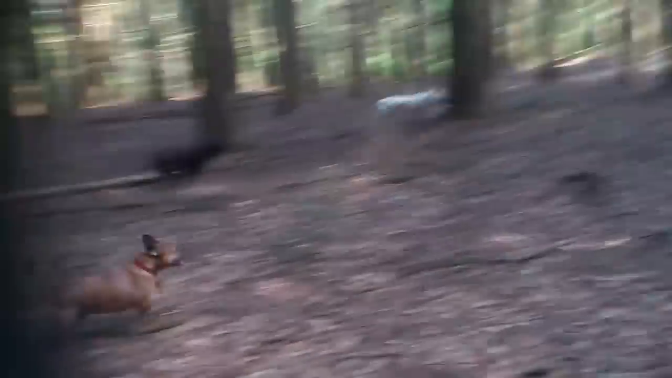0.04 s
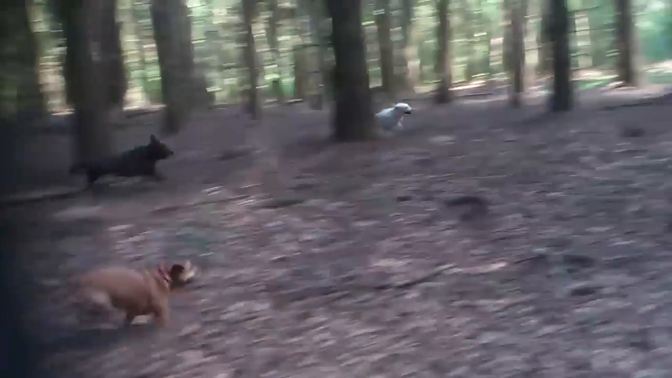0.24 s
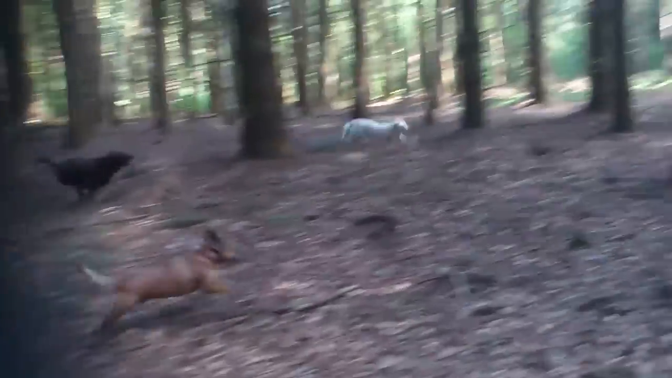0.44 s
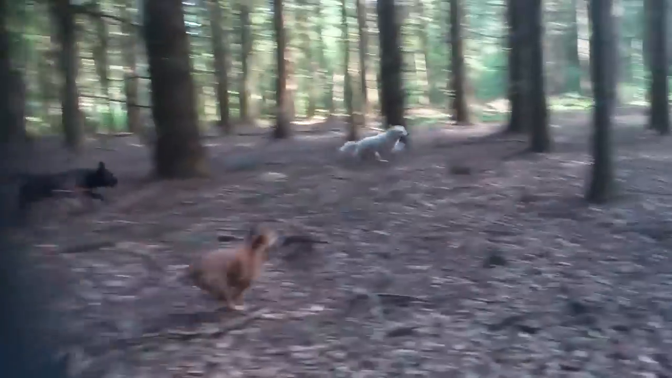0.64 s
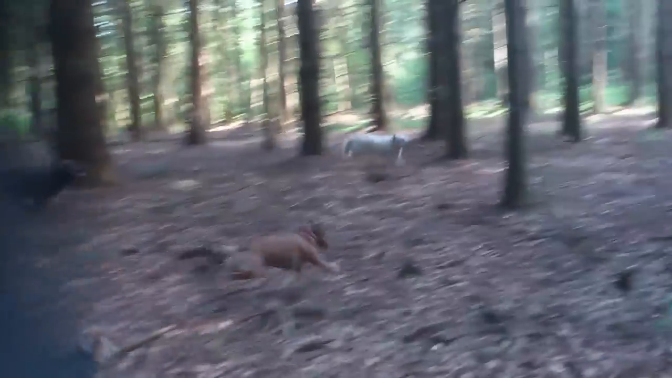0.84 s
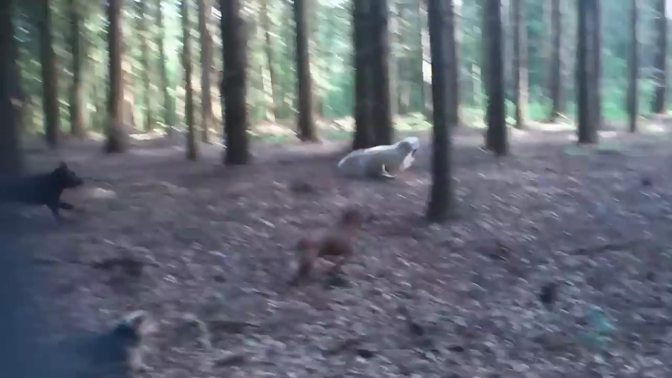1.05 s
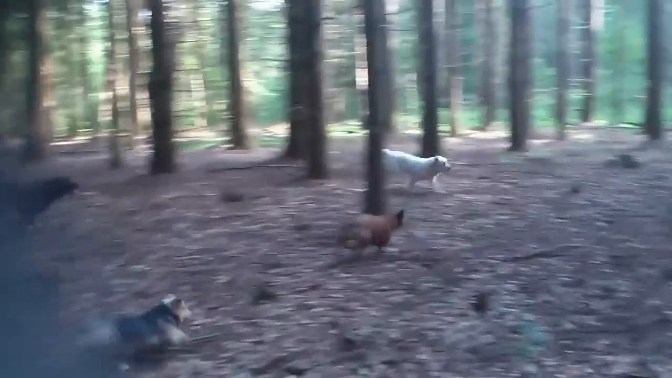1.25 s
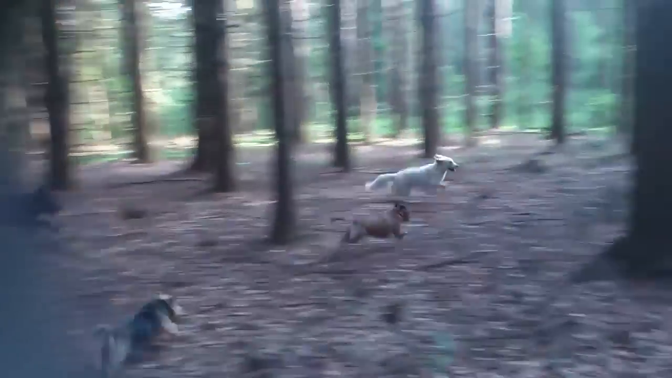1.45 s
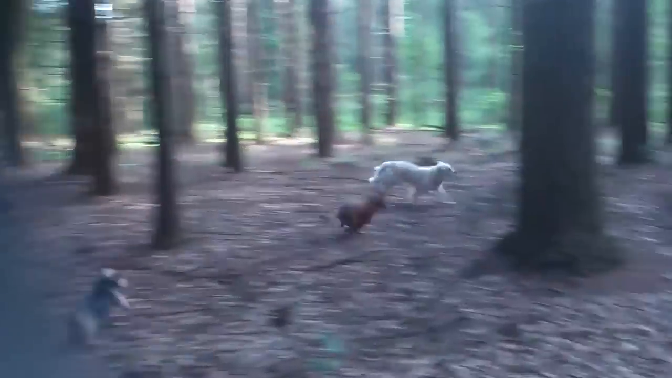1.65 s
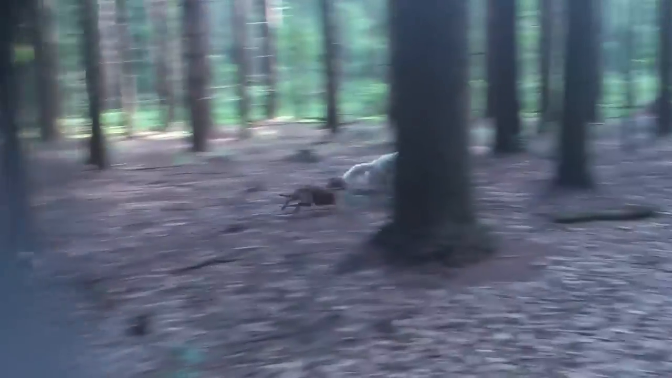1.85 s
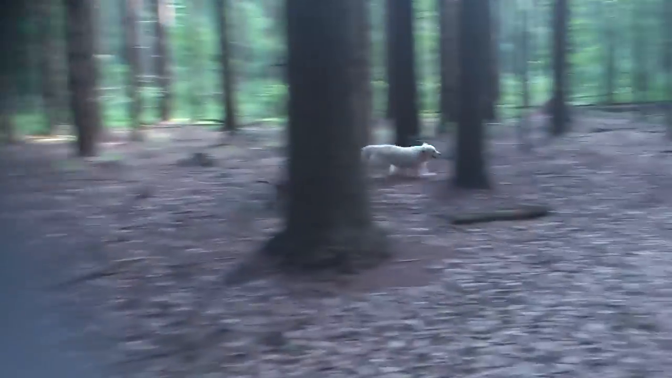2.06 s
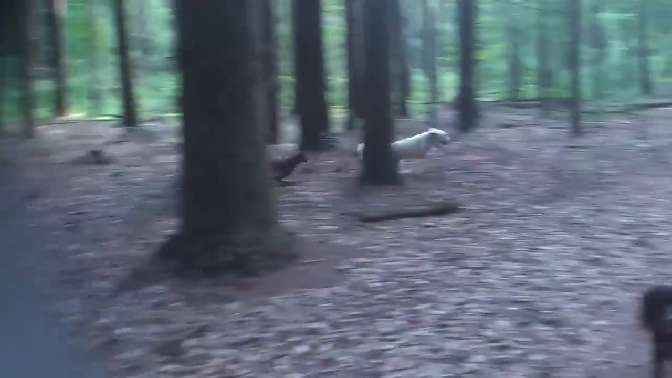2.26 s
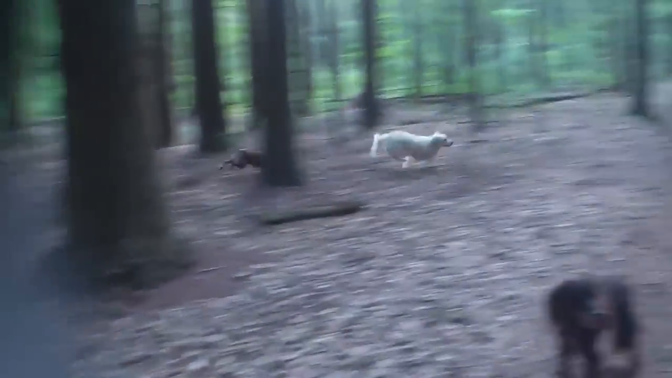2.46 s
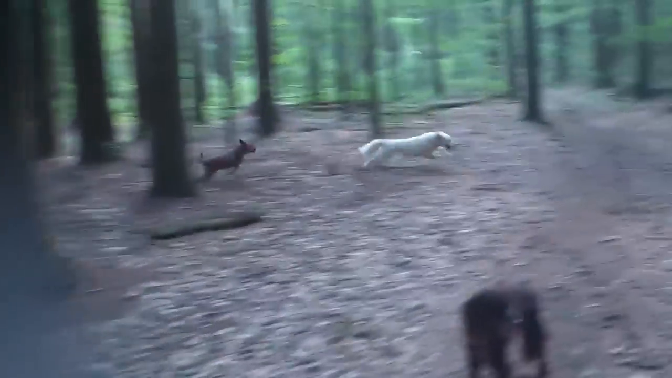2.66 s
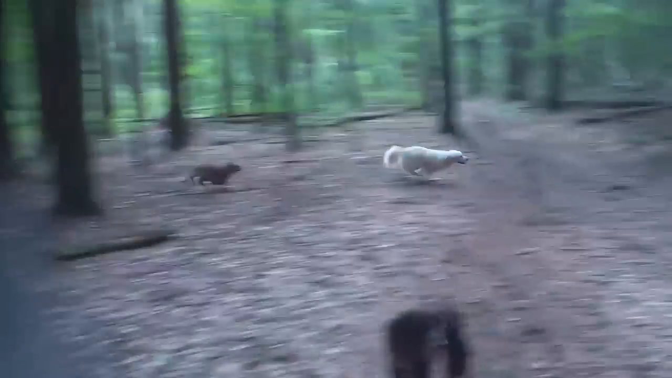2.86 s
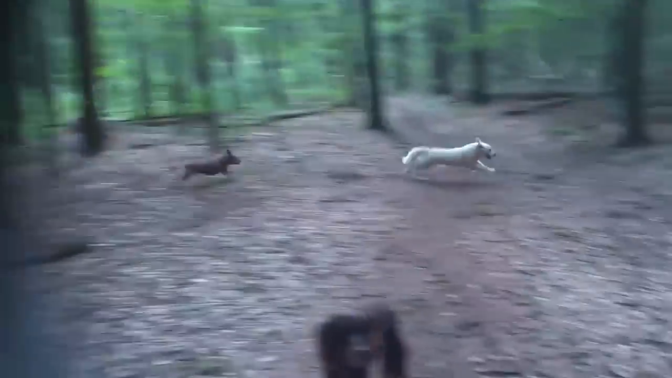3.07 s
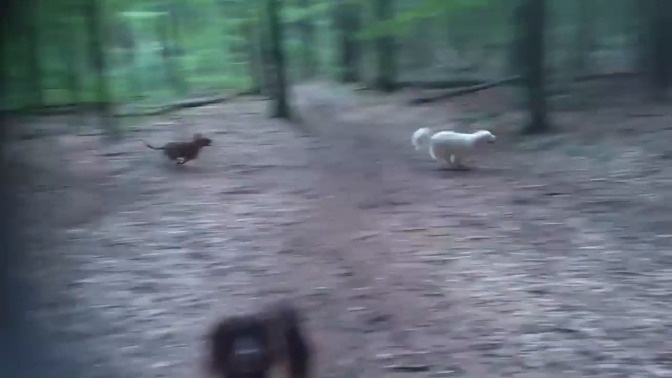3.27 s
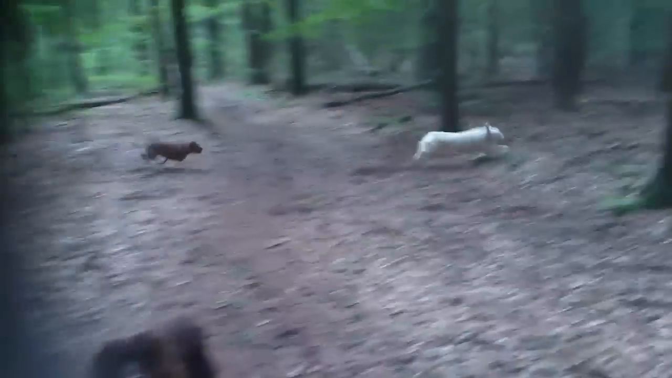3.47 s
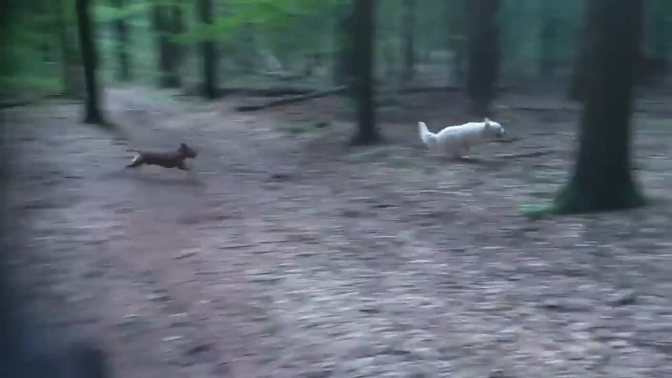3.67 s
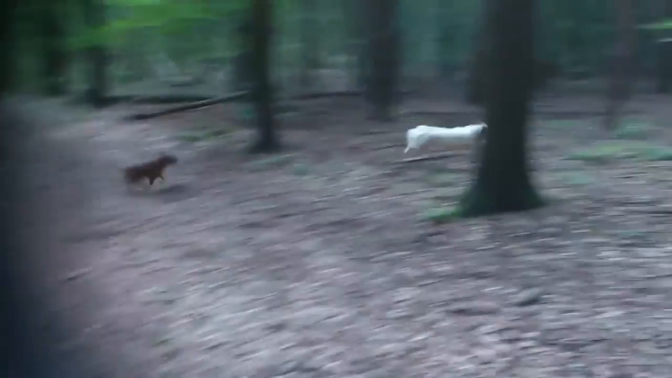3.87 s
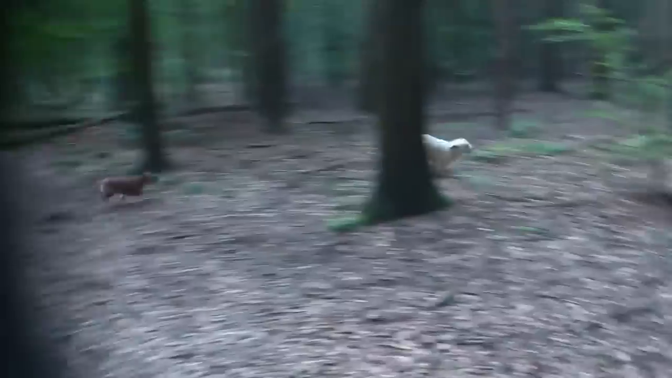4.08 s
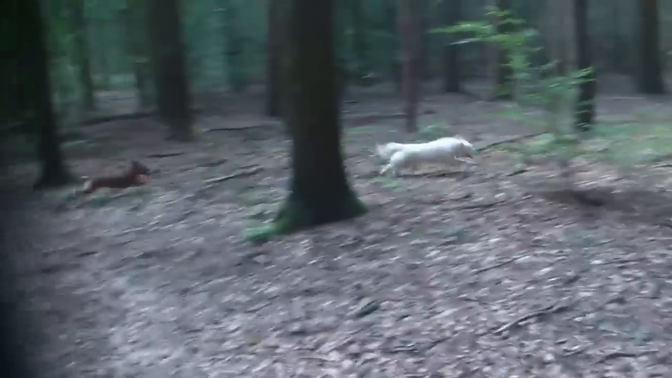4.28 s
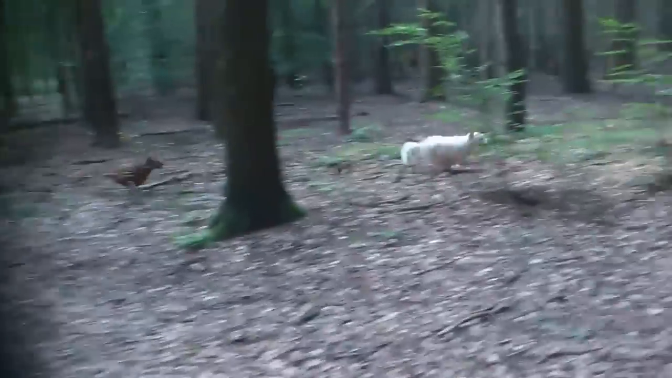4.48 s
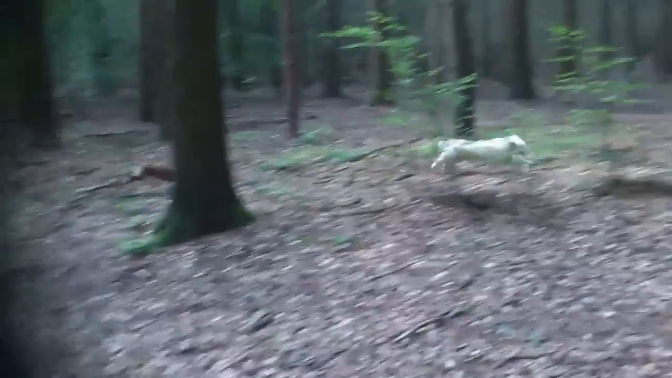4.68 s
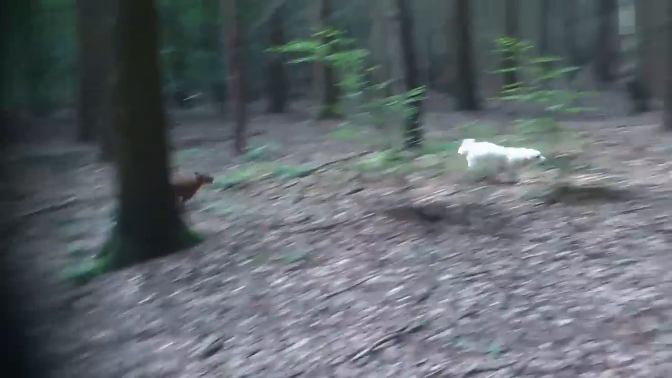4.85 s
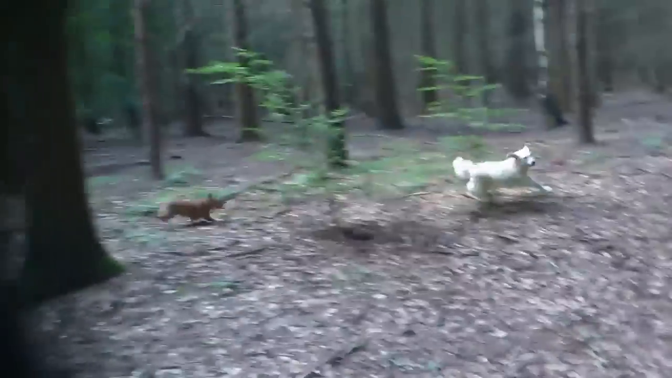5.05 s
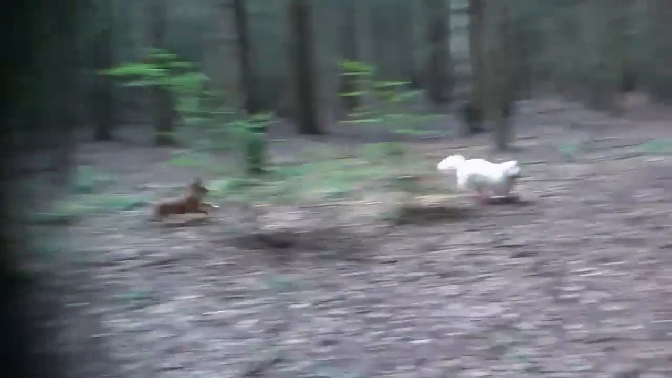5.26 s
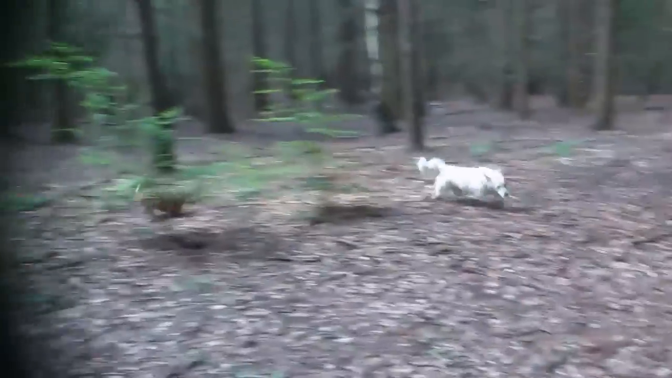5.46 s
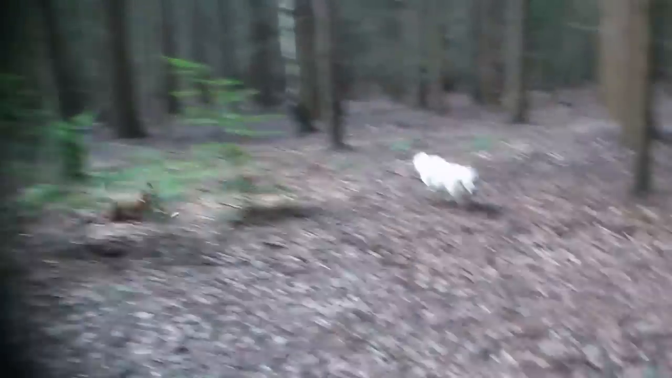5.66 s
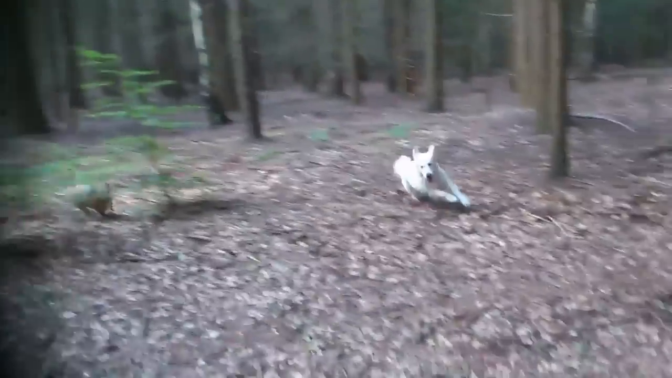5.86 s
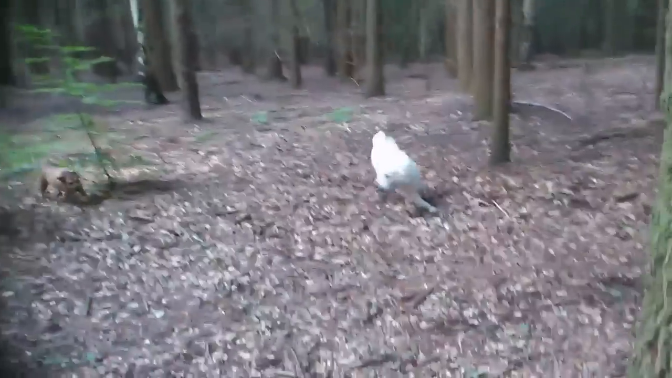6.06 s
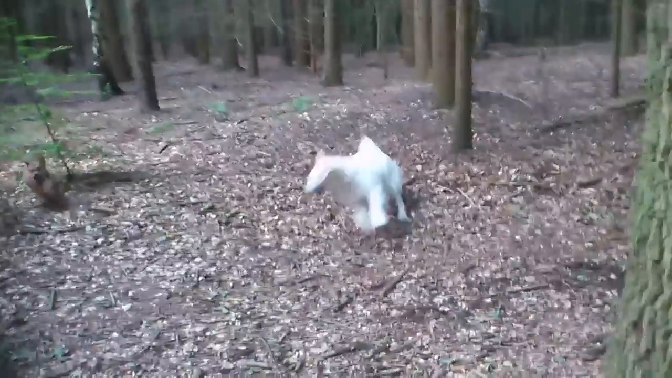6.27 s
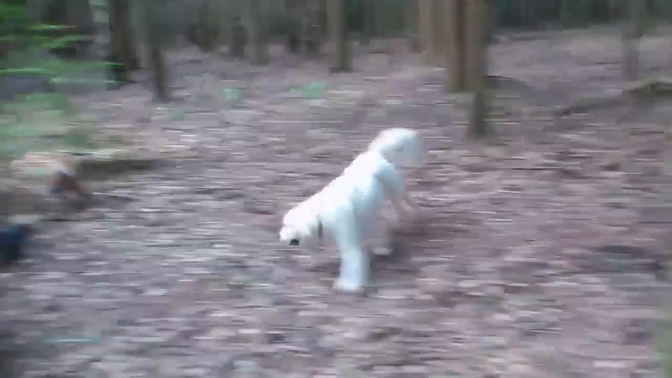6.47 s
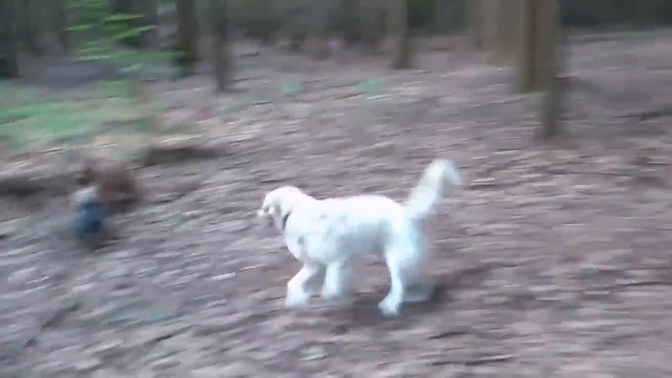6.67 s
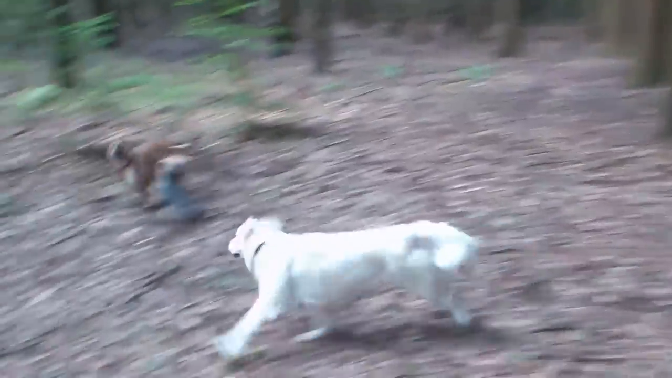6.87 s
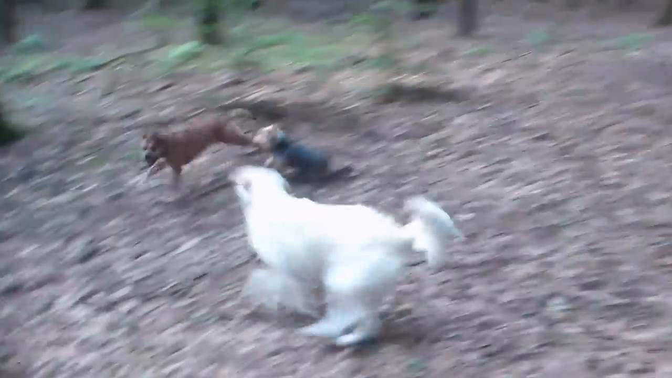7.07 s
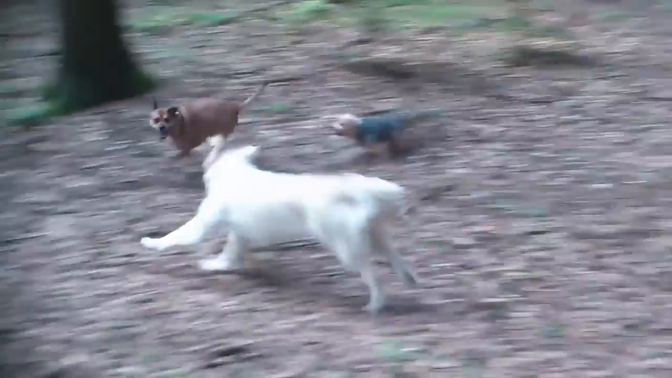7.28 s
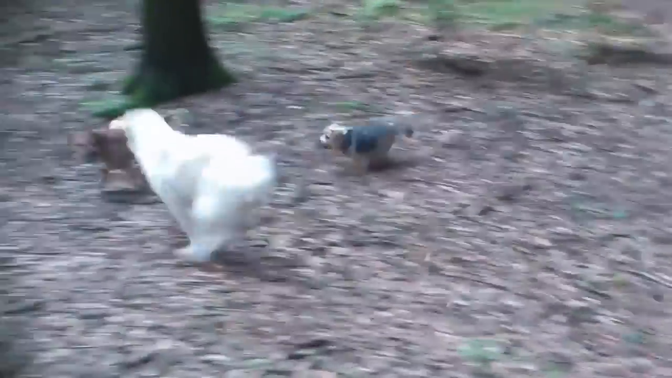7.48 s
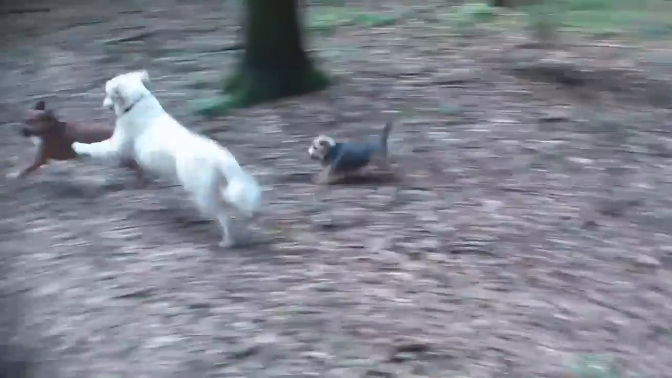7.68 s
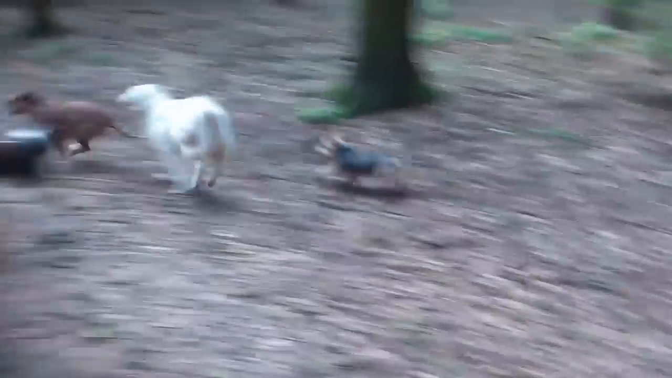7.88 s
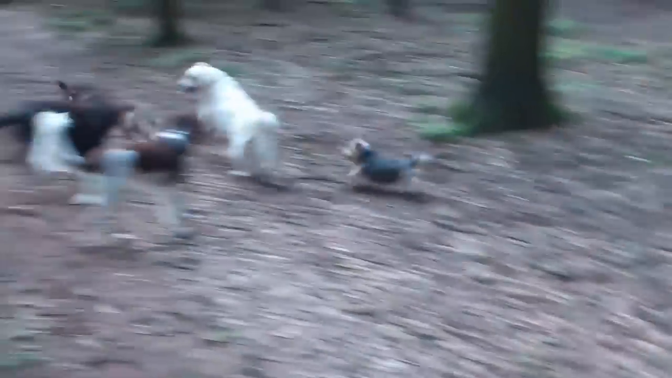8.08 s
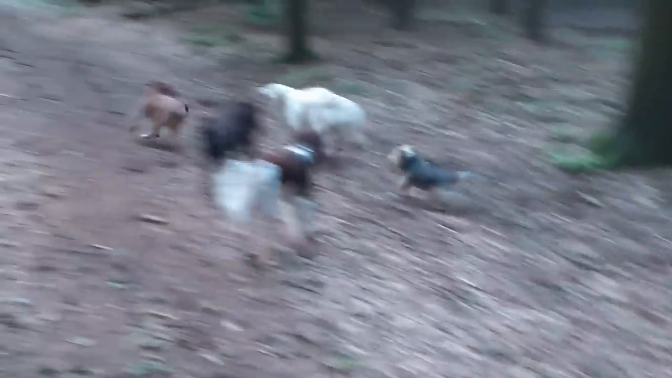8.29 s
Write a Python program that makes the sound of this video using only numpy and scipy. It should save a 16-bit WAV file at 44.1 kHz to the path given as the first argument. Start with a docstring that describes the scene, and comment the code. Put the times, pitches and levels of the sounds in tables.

```python
"""Dogs gallop through dry leaves on a forest floor: random fractures make the rustle, and filtered noise
bursts make the paw thuds, low knocks and twig snaps. From about four seconds a collar tag clinks as
ringing modes. Huffs of shaped noise and a short yip follow; then a growl with whines, a snarl and a low
growl, in play, come from rough vocal folds exciting the muzzle. A low forest rumble lies beneath it all.
The sound starts half a second in; of the two ports that hear it the left is bright, the right muffled."""
import sys
import numpy as np
from scipy import signal
from scipy.fft import rfft, irfft, next_fast_len
from scipy.io import wavfile
from scipy.ndimage import uniform_filter1d, minimum_filter1d, map_coordinates

SR = 44100
rng = np.random.default_rng(int(sys.argv[2]) if len(sys.argv) > 2 else 0)


def dump_mix(stems):
    """Bounce the given channels to the path in sys.argv[1] as a 16-bit WAV at rate SR."""
    frames = np.atleast_2d(stems).T  # one column per channel
    limited = np.clip(frames, -1, 1)  # hard clip at full scale
    pcm = np.round(limited * 32767).astype(np.int16)
    wavfile.write(sys.argv[1], SR, pcm)


N = 367353
TIME = np.arange(N) / SR  # seconds


def amp(db):
    """Decibel definition: level to amplitude gain."""
    return 10 ** (np.asarray(db) / 20)


def unit(x):
    """Normalisation: scale to rms 1."""
    return x / np.sqrt(np.mean(x ** 2) + 1e-20)


def along(points, hz):
    """Logarithmic interpolation: read (Hz, value) points on a log frequency axis."""
    f, v = np.transpose(points)
    return np.interp(np.log(hz + 1), np.log(f + 1), v)


def curves(rows):
    """Linear interpolation: one value per sample for each column after the time."""
    s, *cols = np.transpose(rows)
    return [np.interp(TIME, s, c) for c in cols]


def wobble(rate):
    """Slow random modulation: a smooth curve through random knots, rate of them a second."""
    knots = rng.standard_normal(int(N * rate / SR) + 4)
    return map_coordinates(knots, [TIME * rate])


def filtered(x, response):
    """Linear filtering: multiply the spectrum of x by a response of frequency."""
    m = next_fast_len(N + SR // 4)
    hz = np.fft.rfftfreq(m, 1 / SR)
    return irfft(rfft(x, m) * response(hz), m)[..., :N]


def coloured(x, spectrum):
    """Spectral shaping: x takes the slope of a spectrum, at rms 1."""
    return unit(filtered(x, lambda hz: amp(along(spectrum, hz))))


def band(x, low_hz, high_hz):
    """Causal band-pass: only the range between two frequencies passes."""
    sections = signal.butter(2, [low_hz, high_hz], 'band', fs=SR, output='sos')
    return signal.sosfilt(sections, x)


def add(track, s, sound):
    """Superposition: mix a sound into a track from s seconds on."""
    part = track[..., round(s * SR):][..., :sound.shape[-1]]
    part += sound[..., :part.shape[-1]]


def resonance(x, centre_hz, width_hz):
    """Moving resonance: shift the centre to zero, low-pass twice and shift back, at rms 1."""
    turn = np.exp(2j * np.pi * np.cumsum(centre_hz) / SR)
    pole = signal.butter(1, width_hz / 2, fs=SR)
    skirt = signal.butter(1, width_hz * 2, fs=SR)
    baseband = signal.lfilter(*pole, x / turn)
    return unit((signal.lfilter(*skirt, baseband) * turn).real)


def from_left(x, lag_s):
    """Arrival-time difference: the sound reaches the right port a little later."""
    return np.array([x, filtered(x, lambda hz: np.exp(-2j * np.pi * hz * lag_s))])


def scattered(rate):
    """Random process: unit impulses at random moments, on average rate a second."""
    return 1. * (rng.random(N) < rate / SR)


def fading(x, life_s):
    """Exponential decay: every impulse starts at once and dies away."""
    return signal.lfilter([1], [1, -np.exp(-1 / (life_s * SR))], x)


def crackle(rate, spread_db, step_db, tick_rate, tick_db):
    """Fracture noise: random leaf breaks over sliding hiss, swelling in random bursts, with sharp ticks."""
    size = amp(spread_db * np.minimum(rng.exponential(size=N), 5))
    flurry = unit(fading(scattered(rate) * size, life_s=0.00011))
    bursts = np.tanh(fading(scattered(rate=38), life_s=0.023))
    hiss = 1.0
    bed = unit(np.hypot(flurry, hiss) * amp(step_db * bursts + 1.44 * wobble(170)))
    stalks = scattered(tick_rate) * amp(tick_db - 30.0 * rng.random(N) ** .5)
    envelope = np.hypot(bed, fading(stalks, life_s=0.0001))
    return unit(envelope * rng.standard_normal((2, N)))


def swell(s, length, peak_share):
    """Loading and release: a smooth rise to 1 after a share of the length, then a slower fall."""
    u = np.clip((TIME - s) / (length * peak_share), 0, 20)
    return (u * np.exp(1 - u)) ** 2


def rustle(pack, paws):
    """Power summation: a group's steady rustle plus a swell under every heavy paw."""
    power = amp(curves(pack)[0]) ** 2
    for s, length, db in paws:
        # a paw presses hardest after a quarter of its length
        power = power + (amp(db) * swell(s, length, peak_share=0.25)) ** 2
    return np.sqrt(power)


# Spectra of crushed leaves, near and far. Each row: frequency in Hz, relative density in dB per Hz.
NEAR_LEAF_SPECTRUM = [(60, -42), (200, -17.5), (400, -16.5), (800, -14.5), (1200, -12), (2000, -11),
                      (3000, -5), (5000, -6.5), (7000, -1.5), (16000, 3.5)]
FAR_LEAF_SPECTRUM = [(100, -33), (400, -29), (1000, -8), (2400, -9), (3700, 0.5), (5000, 9.5), (7000, 5.5),
                     (16000, 2)]
# Steady rustle as each group comes and goes. Each row: time in seconds, relative level in dB.
NEAR_PACK_LEVEL = [(0.5, -27.5), (1.1, -31.5), (1.6, -29), (2.05, -35.5), (2.4, -34), (3.0, -31),
                   (3.2, -37), (3.7, -38.5), (4.3, -35.5), (5.0, -38.5), (5.8, -34.5), (6.5, -35.5),
                   (7.2, -35), (7.8, -36), (8.15, -40.5), (8.33, -35.5)]
FAR_PACK_LEVEL = [(0.5, -41.5), (1.1, -44), (1.6, -42), (2.05, -48.5), (2.4, -45), (3.0, -43.5), (3.2, -47),
                  (3.7, -49), (4.3, -45), (5.0, -46), (5.8, -46), (6.5, -45.5), (7.2, -44), (7.8, -46),
                  (8.15, -49.5), (8.33, -48.5)]
# Paws landing close by on the left, then further off to the right.
# Each row: start in seconds, nominal length in seconds, relative rustle level in dB.
NEAR_FOOTFALLS = [(0.511, 0.07, -29), (0.918, 0.26, -27), (1.085, 0.073, -26), (1.22, 0.075, -42),
                  (1.354, 0.24, -26), (1.527, 0.076, -25), (1.872, 0.068, -32), (2.022, 0.14, -34),
                  (2.213, 0.28, -26), (2.343, 0.18, -26), (2.57, 0.12, -35), (2.73, 0.18, -38),
                  (3.24, 0.087, -41.5), (3.448, 0.14, -32.5), (3.856, 0.16, -34.5), (4.36, 0.073, -32.5),
                  (4.44, 0.098, -34), (4.534, 0.13, -33.5), (4.984, 0.2, -33.5), (5.128, 0.27, -31.5),
                  (5.94, 0.15, -37.5), (6.226, 0.08, -32.5), (6.391, 0.11, -33.5), (6.644, 0.14, -27.5),
                  (6.75, 0.37, -30.5), (6.943, 0.1, -27.5), (7.106, 0.06, -25), (7.16, 0.44, -33.5),
                  (7.37, .08, -35), (7.572, 0.13, -28), (7.784, 0.06, -30), (7.822, 0.095, -31),
                  (7.943, 0.23, -31.5)]
FAR_FOOTFALLS = [(0.53, 0.23, -44), (1.061, 0.11, -41.5), (1.868, .11, -46), (2.222, 0.38, -43),
                 (2.736, 0.2, -43), (3, 0.13, -40.5), (3.795, 0.097, -39.5), (3.893, 0.065, -42.5),
                 (4.114, 0.11, -42.5), (4.208, 0.12, -43), (4.34, 0.12, -38), (4.405, 0.085, -37),
                 (4.55, 0.21, -42), (4.79, 0.17, -42.5), (5.026, 0.18, -40), (5.144, 0.23, -41),
                 (5.28, 0.2, -42.5), (5.56, 0.12, -42), (5.772, 0.18, -47), (5.985, 0.11, -45),
                 (6.638, 0.091, -42.5), (6.738, 0.56, -40.5), (6.915, 0.11, -37), (7.1, 0.092, -49),
                 (7.23, 0.14, -41), (7.521, 0.26, -40), (7.804, 0.18, -41.5), (7.931, 0.2, -41.5),
                 (8.057, 0.034, -37.5)]


def leaves():
    """Granular fracture: two groups of running dogs crush the leaf litter, one to each side."""
    near = crackle(rate=2200, spread_db=1.5, step_db=3.4, tick_rate=60, tick_db=12)
    far = crackle(rate=2000, spread_db=1.0, step_db=5, tick_rate=40, tick_db=11)
    near = coloured(near, NEAR_LEAF_SPECTRUM) * rustle(NEAR_PACK_LEVEL, NEAR_FOOTFALLS)
    far = coloured(far, FAR_LEAF_SPECTRUM) * rustle(FAR_PACK_LEVEL, FAR_FOOTFALLS)
    return near * amp([[-2.5], [-9.5]]) + far * amp([[-6], [7]])  # gains: left, right


# Twigs and leaf stalks breaking. Each row: time in seconds, relative crack level in dB,
# relative level of the woody body in dB, pan in dB (positive is to the left).
TWIG_SNAPS = [(0.7143, -21, -22, 1), (0.9977, -18, -27, 2), (1.0227, -16, -29, 0), (1.0536, -18, -25, 0.5),
              (1.2317, -16, -15, 3), (1.2398, -16, -28, 2), (1.2955, -20.5, -13, 1.5),
              (1.5314, -2, -16, 0.5), (1.5537, -5.5, -36, -1), (1.6025, -16, -29, 0), (1.6368, -17, -27, 0),
              (1.7432, -20, -28, 2), (2.2142, -11, -35, -0.5), (2.2855, -19, -18, 1),
              (2.3658, -6, -29, 2.5), (2.65, -18, -28, 0.5), (2.6942, -22, -28, 2), (2.7768, -20, -28, 2),
              (2.9009, -18, -28, 2), (3.0255, -20, -22, 1), (3.2685, -23, -22, 1), (3.3728, -28, -15, -0.5),
              (3.6664, -26, -28, 2), (3.907, -22, -26, 1), (4.0916, -20, -31, 6), (4.1186, -24, -13, -9),
              (4.2663, -24, -26, 1), (4.3018, -25, -14, -8), (4.3318, -25, -14, -7), (4.673, -28, -15, -7),
              (4.7137, -24, -14, -9), (4.752, -18.5, -26, 2), (4.762, -24, -26, 2), (4.858, -27, -16, -6),
              (4.897, -24, -28, 2), (5.015, -21, -27, 0), (5.0464, -19, -25, -2), (5.2368, -22, -26, 1),
              (5.582, -27, -14, -8), (5.7492, -26, -14, -7), (5.9822, -21, -26, 1), (6.1848, -22, -24, 1.5),
              (6.3495, -21, -26, 1), (6.5098, -23, -26, 1), (6.5643, -22, -26, 1), (6.7861, -19, -17, 1),
              (7.0415, -23, -26, 1), (7.173, -19, -28, 2), (7.3605, -26, -16, -2), (7.7953, -18, -29, 3.5),
              (7.8437, -24, -16, 1.5), (7.8531, -17, -25, 2.5), (7.998, -18, -18, 0),
              (8.2214, -17.5, -23, 2.5), (8.2828, -24, -28, 2)]


def twigs():
    """Brittle fracture: a sharp crack and a brief woody knock; the loudest tear for the longest."""
    out, t = np.zeros((2, N)), np.arange(SR // 50) / SR
    for s, db, body_db, pan_db in TWIG_SNAPS:
        tear_s = .0028 * (1 + 13 * amp(db) ** 4)
        fibres = np.sign(rng.standard_normal((2, 2, len(t))))
        crack = band(fibres[0] * amp(-60 * (t / tear_s) ** 2), 10200, .48 * SR)
        wood = band(fibres[1] * amp(-60 * t / 0.014), 3000, 8800)
        crack = crack / np.abs(crack).max(1, keepdims=True)
        wood = wood / np.abs(wood).max(1, keepdims=True)
        snap = crack + amp(body_db + 9.0) * wood
        sides = amp([[min(pan_db, 0)], [-pan_db / 2]])
        add(out, s + .0008, amp(db + 2) * snap * sides)
    return out


# Low paw thuds, and higher knocks mostly of snapping twigs. Each row: time in seconds,
# relative peak level in dB, nominal centre frequency in Hz.
THUDS_AND_KNOCKS = [(0.916, -48, 190), (1.118, -38.5, 750), (1.129, -46, 170), (1.296, -35, 1500),
                    (1.467, -49, 180), (1.521, -45, 164), (1.532, -33, 1700), (1.581, -47, 170),
                    (1.69, -46, 129), (2.286, -42, 1400), (2.368, -33.5, 1520), (2.849, -41.5, 1300),
                    (3.255, -49, 127), (3.269, -40, 1400), (3.373, -39, 950), (3.512, -44.5, 1200),
                    (4.085, -45.5, 124), (4.333, -48, 166), (5.855, -38.5, 613), (7.008, -36.5, 194),
                    (7.313, -38, 200), (7.398, -40, 240)]


def thuds(t60=0.092):
    """Damped impact: low paw thuds, and higher, shorter knocks mostly of snapping twigs."""
    out, t = np.zeros(N), np.arange(SR // 8) / SR
    for s, db, centre_hz in THUDS_AND_KNOCKS:
        life_s = t60 * np.sqrt(150 / centre_hz)  # t60 holds at 150 Hz
        burst = rng.standard_normal(len(t)) * amp(-60 * t / life_s)
        push = band(burst, centre_hz * 0.19, centre_hz * 1.86)
        add(out, s, amp(db - 1.5) * push / np.abs(push).max())
    return np.array([out, out])


def nasal_dip(x, centre_hz=1660, q=7.2):
    """Side-branch absorption: the nose swallows a band between the mouth and teeth resonances."""
    return signal.lfilter(*signal.iirnotch(centre_hz, q, SR), x)


# A short yip and high whines. Each row: start in seconds, length in seconds, relative level in dB,
# first and last pitch in Hz, share of the length before the peak.
WHINE_GLIDES = [(5.167, 0.026, -45.5, 520, 740, 0.3), (6.734, 0.097, -36, 1150, 943, 0.55),
                (6.872, 0.075, -33, 915, 960, 0.2), (6.921, 0.075, -46, 982, 1036, 0.3)]


def whine(flap, jitter=0.0338):
    """Amplitude modulation: a second, much higher fold oscillation glides, shaken by the same flapping."""
    out = np.zeros(N)
    for s, length, db, first_hz, last_hz, peak_share in WHINE_GLIDES:
        u = np.clip((TIME - s) / length, 0, 1)
        pitch_hz = (first_hz + (last_hz - first_hz) * u) * (1 + jitter * wobble(260))
        tone = np.sin(2 * np.pi * np.cumsum(pitch_hz) / SR)
        envelope = np.interp(u, [0, peak_share, 1], [0, 1, 0])
        out += amp(db) * envelope * unit(tone * (flap + 0.26))
    return out


# One table for each call: a growl, a snarl and a low growl. Each row: time in seconds,
# relative effort in dB, jaw opening from 0 to 1, mean pitch in Hz, mouth resonance in Hz,
# relative chest tone level in dB.
GROWL_CALLS = [
    [(6.53, -61, .8, 204.3, 1300, -70), (6.6, -53.5, 0.75, 214, 1200, -58.5),
     (6.7, -53, .65, 248.7, 1270, -59), (6.79, -47, 0.9, 246, 1030, -55),
     (6.81, -47.5, 0.62, 240.6, 950, -53), (6.86, -47, 0.7, 233.4, 930, -59),
     (6.888, -44.5, 0.7, 250, 940, -58), (6.97, -44.5, 0.7, 224, 1050, -58),
     (7.0, -49.5, 0.6, 205, 1160, -51), (7.05, -54, 0.6, 200.4, 1150, -60)],
    [(7.198, -55, .9, 238, 1250, -62), (7.226, -45.5, 0.97, 258.9, 1300, -57),
     (7.272, -40.5, 0.92, 280, 1340, -53), (7.305, -52, 0.94, 261.5, 1250, -56),
     (7.345, -63, .5, 239.3, 1194, -66)],
    [(7.462, -64, .3, 225.2, 1200, -60), (7.495, -49, 0.5, 234.8, 1140, -46.5),
     (7.53, -51, 0.56, 225, 1110, -47), (7.568, -42.5, 0.4, 261.9, 1068, -47),
     (7.59, -48.5, 0.7, 257.3, 1070, -48), (7.644, -46.5, 0.5, 244.7, 1001, -45),
     (7.695, -49.5, .6, 225.8, 940, -50), (7.728, -46.5, 0.08, 257, 905, -43),
     (7.775, -57, 0, 224.2, 900, -48), (7.808, -48, 0, 224.5, 980, -49),
     (7.865, -52, 0.11, 218.7, 920, -48.5), (7.894, -43.5, .25, 250.2, 980, -47),
     (7.96, -49.5, .4, 209.3, 1110, -51), (8.01, -57, 0.61, 212, 1169, -74)],
]
# The lips shape the muzzle from call to call. Each row: time in seconds, throat resonance in Hz,
# teeth resonance in Hz, relative teeth level in dB.
LIP_SHAPES = [(6.6, 600, 2180, -5), (6.76, 640, 2350, -3), (6.9, 623, 2130, -4), (7.0, 565, 2400, -5),
              (7.27, 660, 2520, 0), (7.5, 498.7, 2100, -8), (7.57, 510, 2000, -1), (7.7, 525, 1920, 1),
              (7.81, 583, 1887, -9), (7.89, 525, 1960, 1), (8.0, 616, 2050, 1)]
# An opening jaw trades throat resonance for mouth resonance. Rows are throat and mouth;
# each row: gain shut in dB, gain wide open in dB.
JAW_GAIN = [(4, -9.5), (-6, 6)]
# The band that the muzzle radiates: lower limit in Hz, upper limit in Hz.
MUZZLE_BAND = (434, 4600)


def growl(jitter=.035, flap_hz=88, flap_depth=0.61, roughness=0.36, rasp_db=23.5, fade_s=.02):
    """Source and filter: unsteady folds, chopped by flapping throat tissue, shake chest and ring muzzle."""
    rows = [row for call in GROWL_CALLS for row in call]
    effort_db, opening, pitch_hz, mouth_hz, chest_db = curves(rows)
    throat_hz, teeth_hz, teeth_db = curves(LIP_SHAPES)
    unsteady_hz = pitch_hz * (1 + jitter * wobble(32) + .05 * wobble(210))
    phase = 2 * np.pi * np.cumsum(unsteady_hz) / SR
    pulses = unit(np.diff(phase // (2 * np.pi), prepend=0))
    throb = np.cos(2 * np.pi * np.cumsum(flap_hz * (1 + 0.2163 * wobble(60))) / SR)
    flap = 1 + flap_depth * throb
    # roughness is the share of power that is noise before flapping
    folds = np.sqrt(1 - roughness) * pulses + np.sqrt(roughness) * rng.standard_normal(N)
    source = folds * flap

    sounding = np.zeros(N)
    for call in GROWL_CALLS:
        inside_s = np.minimum(TIME - call[0][0], call[-1][0] - TIME)
        sounding += np.clip(inside_s / fade_s, 0, 1)
    throat_db, jaw_mouth_db = [shut + (wide - shut) * opening for shut, wide in JAW_GAIN]
    # each resonance flutters on its own
    throat, mouth, teeth = [sounding * amp(effort_db + db + 1.5 * wobble(45))
                            for db in (throat_db, jaw_mouth_db, teeth_db)]

    fundamental = unit(np.sin(phase) * amp(3.8 * wobble(130)))
    # the flapping adds its own low throb to the chest tone
    chest = sounding * amp(chest_db) * (fundamental + amp(-17.5) * unit(throb))
    # neighbouring resonances alternate in sign
    muzzle = throat * resonance(source, throat_hz, width_hz=145)
    muzzle -= mouth * resonance(source, mouth_hz, width_hz=220)
    muzzle += teeth * resonance(source, teeth_hz, width_hz=340)
    # air rasps through the teeth, most where the jaw is open and the teeth resonance strong
    bared = opening * teeth / (teeth + amp(-24.0))
    rasp = teeth * bared * unit(band(source, 1880, 3250)) * amp(rasp_db)
    voice = nasal_dip(band(muzzle, *MUZZLE_BAND) + rasp)
    return chest, voice + whine(flap)


# Voiceless woofs. Each row: start in seconds, length in seconds, relative level in dB,
# mouth resonance in Hz.
HUFF_PUFFS = [(4.615, 0.3, -57.5, 1100), (5.15, 0.18, -50.5, 1740), (5.507, 0.16, -53.5, 1150),
              (5.927, 0.22, -49, 1430), (6.319, 0.12, -46, 1260), (7.104, 0.062, -47.5, 1500)]


def huffs(throat_hz=870, teeth_hz=2500):
    """Turbulent excitation: short puffs of noisy air ring the resonances of the open muzzle."""
    effort = np.zeros(N)
    for s, length, db, _ in HUFF_PUFFS:
        u = np.clip((TIME - s) / length, 0, 1)
        effort += amp(db) * np.sin(np.pi * u ** 0.26)  # quick attack, slow release
    air, mouth_hz = rng.standard_normal((3, N)), curves(HUFF_PUFFS)[-1]
    muzzle = amp(-5.5) * resonance(air[0], np.full(N, throat_hz), width_hz=220)
    muzzle += resonance(air[1], mouth_hz, width_hz=560)
    muzzle += amp(-6.0) * resonance(air[2], np.full(N, teeth_hz), width_hz=960)
    return effort * unit(band(muzzle, *MUZZLE_BAND))


# Clinks of a metal collar tag. Each row: time in seconds, relative level in dB,
# brightness in dB per octave.
TAG_CLINKS = [(4.235, -51.5, -5), (4.445, -41, 6), (4.683, -44, -1), (4.905, -48, -6.5), (5.775, -51, -4),
              (7.366, -54, 11)]
# Modes of the tag. Each row: frequency in Hz, relative level in dB, 60 dB decay time in seconds.
TAG_MODES = [(3624, -5, 0.2), (3738, -6, 0.2), (7830, -1.5, 0.13), (9344, -7, .17), (15353, -9, .12)]


def collar(contact_s=0.0081, pivot_hz=7000, swirl_rad=.7):
    """Modal vibration: the tag meets its ring softly and its modes ring on, blurred by its swinging."""
    out, t = np.zeros(N), np.arange(SR // 4) / SR
    for s, db, tilt_db in TAG_CLINKS:
        for hz, mode_db, t60 in TAG_MODES:
            swirl = swirl_rad * unit(uniform_filter1d(rng.standard_normal(len(t)), size=400))
            level_db = mode_db + tilt_db * np.log2(hz / pivot_hz)
            ring = amp(level_db - 60 * t / t60) * np.sin(2 * np.pi * hz * t + swirl)
            add(out, s, amp(db + 5.0) * ring * (1 - np.exp(-t / contact_s)))
    return out * amp([[-1], [1]])  # gains: left, right


# Echo among the trees. Each row: frequency in Hz, 60 dB decay time in seconds.
TREE_DECAY = [(200, 0.034), (1100, 0.062), (2300, 0.12), (5000, 0.22), (14000, 0.036)]


def trees(x, size=4096):
    """Diffuse scattering: trunks and ground return a short echo, its random tail redrawn block by block."""
    out, padded = np.zeros((2, N)), np.pad(x, (0, size))
    window = np.sin(np.pi * np.arange(size) / size)
    for start in range(0, N, size // 2):
        piece = padded[start:start + size] * window
        hz, t, z = signal.stft(rng.standard_normal((2, SR // 5)), SR, nperseg=256)
        decay = amp(-60 * t / along(TREE_DECAY, hz)[:, None])
        tail = signal.istft(z * decay, SR, nperseg=256)[1]
        add(out, start / SR, signal.fftconvolve(piece[None], tail / np.linalg.norm(tail[0]), axes=1))
    return out


# Spectrum of the forest rumble. Each row: frequency in Hz, relative density in dB per Hz.
FOREST_SPECTRUM = [(15, -31), (30, -3), (48, 2.5), (75, 1), (110, -3), (170, -5.5), (260, -12),
                   (400, -16.5), (650, -15), (1100, -21), (2500, -25.5), (16000, -25.5)]


def forest():
    """Coherent ambient noise: a low rumble of moving air and distant running, nearly alike at both ports."""
    air = rng.standard_normal(N) + 0.34 * rng.standard_normal((2, N))
    return coloured(air, FOREST_SPECTRUM) * amp(-54.5 + wobble(10))


def scene():
    """Superposition: leaves, twigs, paws and dog voices among the trees."""
    chest, muzzle = growl()
    dogs, snaps = muzzle + huffs(), twigs()
    voices = from_left(chest, lag_s=0.0001)
    voices += from_left(dogs, lag_s=0.00022) * amp([[0], [-3]])
    echo = trees(amp(-1.0) * dogs + amp(-17) * snaps[0]) * amp([[0], [-2]])
    return leaves() + snaps + thuds() + voices + echo + collar() + forest()


def limited(x, ceiling=.85):
    """Gain reduction: each channel is ducked briefly after a peak that would overload it."""
    needed = np.minimum(1, ceiling / (np.abs(x) + 1e-9))
    held = minimum_filter1d(needed, size=601, origin=260)
    return x * uniform_filter1d(held, size=64)


# Colour of the left and right ports. Each row: frequency in Hz, gain in dB.
LEFT_RESPONSE = [(1000, 1.84), (5500, 4.24), (7500, 5.8), (8500, 8.2), (9300, 10.6), (10300, 6.8),
                 (12000, 2.7), (15500, 0.48)]
RIGHT_RESPONSE = [(300, 1), (560, 2.5), (900, 1.5), (1400, 1), (1850, 7), (2300, 4), (3500, 3.5),
                  (5100, -3), (6300, -3), (7500, -8), (10000, -15), (15500, -28)]


def record(dry, start_s=.503, top_hz=15950):
    """Frequency response: each port colours the sound, which is limited, switched on and band-limited."""
    ports = filtered(dry, lambda hz: amp([along(LEFT_RESPONSE, hz), along(RIGHT_RESPONSE, hz)]))
    switched = limited(ports) * (TIME > start_s)
    return filtered(switched, lambda hz: 1 / (1 + (hz / top_hz) ** 250))


dry = scene()
out = record(dry)
dump_mix(out)
```